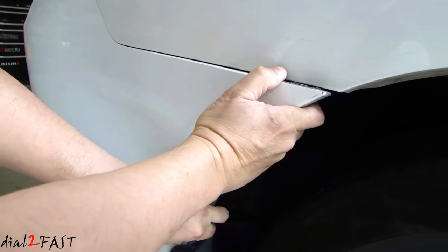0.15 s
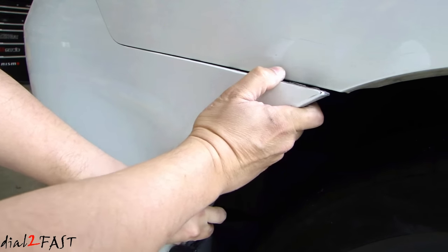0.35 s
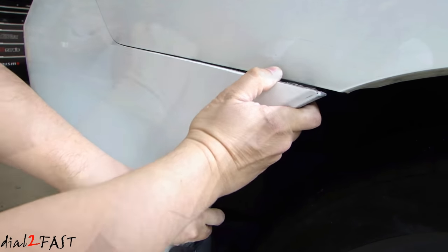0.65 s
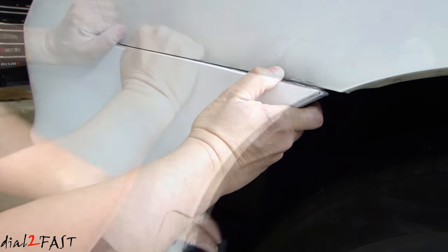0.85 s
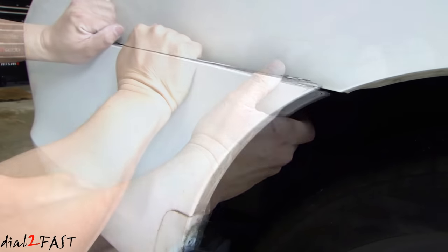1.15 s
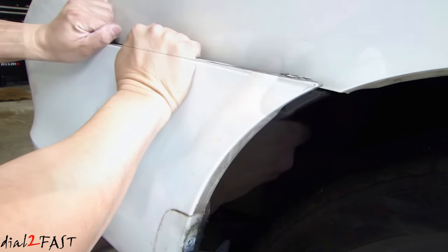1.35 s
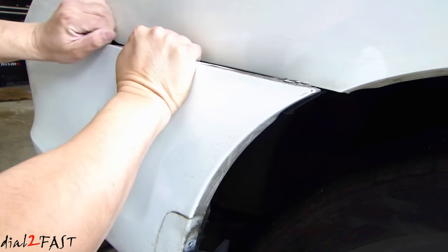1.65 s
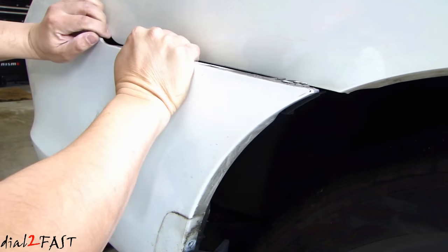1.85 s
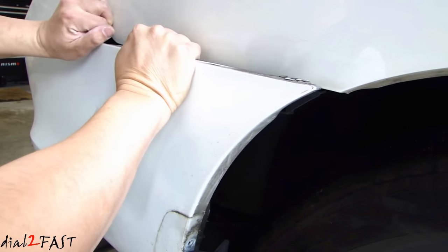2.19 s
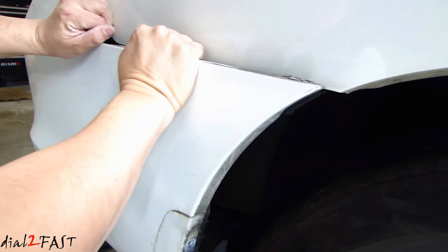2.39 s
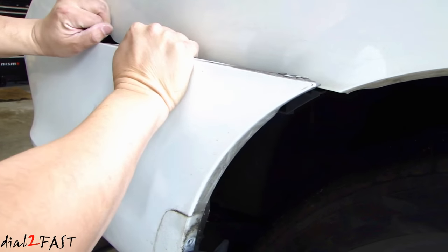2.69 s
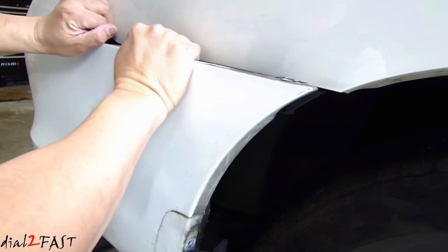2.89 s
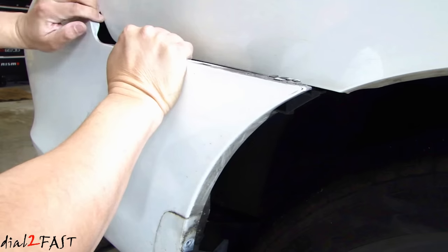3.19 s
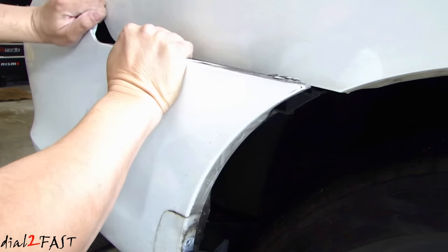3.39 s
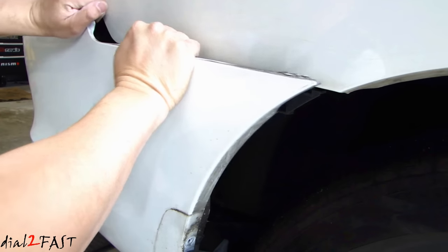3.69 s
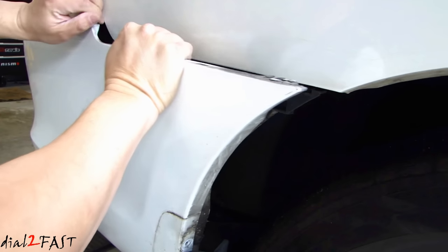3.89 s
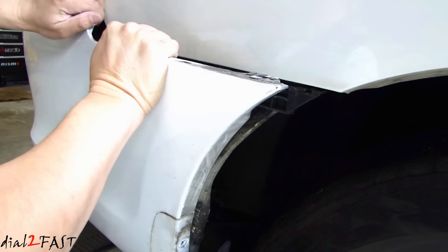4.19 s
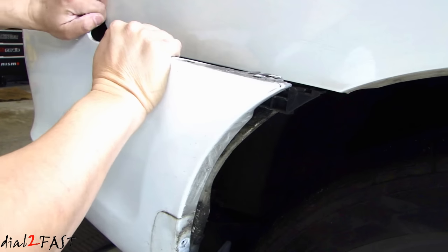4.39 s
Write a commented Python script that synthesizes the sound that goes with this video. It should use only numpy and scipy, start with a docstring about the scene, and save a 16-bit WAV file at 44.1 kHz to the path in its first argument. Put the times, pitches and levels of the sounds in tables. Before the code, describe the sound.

Plastic clips crack loose in two sharp bursts as a car bumper cover is pulled off, with knocks, creaks and scrapes in a reverberant garage.

```python
"""Pulling a bumper cover off a car

Hands pull a plastic bumper cover off in a bare garage: its clips let go with sharp cracks, in two bursts.
Between them it knocks, ticks, groans and scrapes on the wing. Each blow is a jolt and a dying noise crackle
with ringing modes and a garage tail; the friction is shaped noise, and a low sine hums on at the end.
A limiter flattens the loud cracks, and the sound nearly cuts out for an instant after the second burst."""
import sys
import numpy as np
from scipy import signal
from scipy.fft import rfft, irfft, next_fast_len
from scipy.io import wavfile
from scipy.ndimage import uniform_filter1d, map_coordinates

SR = 44100
rng = np.random.default_rng(int(sys.argv[2]) if len(sys.argv) > 2 else 0)


def digitize_waveform(pressure):
    """Quantize a signal to 16-bit integers and store it at the path in sys.argv[1].

    Rows of a 2-D input are taken as channels; values are limited to [-1, 1].
    """
    field = np.atleast_2d(pressure).T
    bounded = np.clip(field, -1, 1)
    quanta = np.round(bounded * 32767).astype(np.int16)
    wavfile.write(sys.argv[1], SR, quanta)


N = 200469  # samples, about 4.5 s

# colour of an edge scraping, shared by slips and creaks: freq_hz, density_db (dB per Hz)
SCRAPE_COLOUR = [(500, -23), (1100, 1), (2500, -2.5), (4000, -7.5), (6500, -23), (12000, -121)]


def amp(db):
    """Decibels to gain."""
    return 10 ** (np.asarray(db) / 20)


def unit(x):
    """Scaled to rms 1."""
    return x / np.sqrt(np.mean(x ** 2) + 1e-20)


def along(points, hz):
    """(Hz, value) points read on a log frequency axis."""
    point_hz, value = np.transpose(points)
    return np.interp(np.log(hz + 1), np.log(point_hz + 1), value)


def filtered(x, response):
    """x times a complex response of frequency, with zero padding against wrap-around."""
    size = x.shape[-1]
    padded = 2 * next_fast_len(size // 2 + 4096)
    spectrum = rfft(x, padded) * response(np.fft.rfftfreq(padded, 1 / SR))
    return irfft(spectrum, padded)[..., :size]


def causal(gain):
    """The minimum-phase response with this gain: it rings only after it is struck."""
    cepstrum = irfft(np.log(np.maximum(gain, 1e-6)))
    half = len(cepstrum) // 2
    folded = np.r_[cepstrum[0], 2 * cepstrum[1:half], np.zeros(half)]
    return np.exp(rfft(folded))


def wobble(rate, size):
    """A smooth random curve through normal values, rate knots a second."""
    knots = rng.standard_normal(int(size * rate / SR) + 4)
    return map_coordinates(knots, [np.arange(size) * rate / SR])


def diffuse(size, strength=1):
    """Stereo noise from all sides, following a strength: alike in the bass, unrelated in the treble."""
    # stereo width of diffuse sound: freq_hz, side_to_mid_db
    width = [(60, -2), (130, -9.5), (330, -8), (690, -4.5), (1270, -3), (2300, 0), (5000, 1), (11000, 1)]
    turn = np.arctan(amp(along(width, np.fft.rfftfreq(size, 1 / SR))))
    noise = rfft(strength * rng.standard_normal((2, size)))
    mid, side = irfft(noise * [np.cos(turn), np.sin(turn)], size)
    return np.array([mid + side, mid - side])


def garage(build_s=0.009):
    """A fresh stereo reverb tail: noise builds up, then each frequency dies at its own speed."""
    # how long the room rings: freq_hz, t60_s
    decay = [(100, 0.26), (300, 0.65), (1000, 0.72), (2700, 0.82), (5000, 0.68), (11000, 0.47)]
    # what the walls return: freq_hz, level_db
    walls = [(100, 14), (400, 3.5), (1200, 3), (3000, -3), (6000, -3), (11000, -1), (13500, -14)]
    hz, t, bands = signal.stft(diffuse(SR), SR, nperseg=256)
    dying = bands * amp(-60 * t / along(decay, hz)[:, None])
    tail = signal.istft(dying, SR, nperseg=256)[1][:, :SR]
    build = 1 - np.exp(-np.arange(SR) / SR / build_s)
    tail = unit(tail * build) / np.sqrt(SR)  # energy 1 before the walls colour it
    return filtered(tail, lambda hz: amp(along(walls, hz)))


def rings(modes, count, longest_s, split=0.01914, neighbour_db=-4, scatter_db=1.5, spread=0.26, swell_s=0.00033):
    """One stereo ring for each of count blows; every mode beats against two close, weaker neighbours."""
    t = np.arange(SR) / SR
    hz, db, t60 = np.repeat(np.array(modes, float), 3, axis=0).T[:, :, None]
    offset = np.tile([-1, 0, 1], len(modes))[:, None]
    # split is the average detuning of a neighbour, as a fraction of its mode
    hz = hz * (1 + split * offset * (.5 + rng.random(hz.shape)))
    # the gripping hands limit every mode to longest_s, and plastic loses its high modes soonest
    life = np.minimum(t60, longest_s) / np.hypot(1, hz / 2500)
    fade = np.exp(-np.log(1000) * t / life)
    waves = amp(db + neighbour_db * np.abs(offset)) * fade * np.exp(2j * np.pi * hz * t)
    # each blow excites the modes a little differently
    size, skew, phase = rng.standard_normal((count, 3, 1, len(hz))).swapaxes(0, 1)
    # higher modes are further out of phase between left and right
    apart = spread * hz.T / np.hypot(hz.T, 1000) * skew * np.array([[1], [-1]])
    weights = amp(scatter_db * size) * np.exp(1j * (np.pi * phase + apart))
    ringing = (weights @ waves).imag * (1 - np.exp(-t / swell_s))
    # little is radiated below the lowest mode
    radiation = signal.butter(N=3, Wn=0.63 * modes[0][0], btype="high", fs=SR, output="sos")
    return signal.sosfilt(radiation, ringing)


def blows(contacts, modes, level_db, modes_db, longest_s, low_hz, spike, grit_db, bright_hz, rise_s, lag_s=.00005):
    """Each contact is one jolt and a gritty, dying crackle; the plastic rings and the garage answers."""
    # contacts: start_s, strength_db, boom_db, sizzle_db, crackle_t60_s, garage_db, ring_db
    # basic colour of a crack: freq_hz, density_db (dB per Hz)
    crack = [(24, -94), (40, -63), (80, -72), (107, -15.5), (160, -25.5), (235, -11), (354, -4),
             (508, -4.5), (710, -5), (781, -3.5), (860, -3), (1200, -6.5), (1720, -10.5), (3000, -11),
             (3700, -17), (5200, -22), (6200, -26.5), (10700, -32), (12300, -33.5), (14000, -64),
             (16000, -92), (22000, -120)]
    out, t = np.zeros((2, N + SR)), np.arange(SR) / SR
    # the jolt reaches the right channel lag_s early and brightens above bright_hz
    side = np.array([[-1], [1]])
    jolt = filtered(signal.unit_impulse(SR, 16), lambda hz: np.exp(1j * np.pi * hz * lag_s * side))
    jolt = filtered(jolt, lambda hz: np.hypot(1, hz / bright_hz))
    all_rings = rings(modes, len(contacts), longest_s)
    for (s, db, boom_db, sizzle_db, t60, room_db, ring_db), ring in zip(contacts, all_rings):
        grit = amp(grit_db * wobble(900, SR))
        envelope = (1 - np.exp(-t / rise_s)) * np.exp(-np.log(1000) * t / t60)
        crackle = unit(diffuse(SR, grit * envelope)) / np.sqrt(SR)
        # spike is the jolt's amplitude against the crackle
        push = (crackle + spike * jolt) / np.hypot(1, spike) + amp(room_db) * garage()
        tilt = [(120, boom_db / 2), (450, boom_db), (1900, 0), (7000, sizzle_db)]

        def colour(hz):
            # small parts radiate little below low_hz
            radiated = hz ** 2 / np.hypot(hz ** 2, low_hz ** 2)
            return causal(amp(along(crack, hz) + along(tilt, hz)) * radiated)

        sound = amp(level_db) * filtered(push, colour) + amp(modes_db + ring_db) * ring
        out[:, round(s * SR):][:, :SR] += amp(db) * sound
    return out[:, :N]


def rub(spectrum, grain_db, grain_rate):
    """Friction noise of rms 1 whose strength flutters as the surfaces catch and slip."""
    size = next_fast_len(N)
    grip = amp(grain_db * wobble(grain_rate, size))
    return unit(filtered(diffuse(size, grip)[:, :N], lambda hz: amp(along(spectrum, hz))))


def air():
    """The quiet garage's steady rush: diffuse noise with a fixed colour."""
    # colour of the rush: freq_hz, density_db (dB per Hz)
    rush = [(15, -50), (25, -13), (74, -10.5), (130, -6), (594, -1.5), (755, -2.5), (886, -4), (1360, -8.5),
            (1720, -8.5), (3730, -14), (5130, -17.5), (9990, -23.5), (12200, -23), (14000, -93)]
    noise = diffuse(next_fast_len(N))[:, :N]
    return amp(-48) * unit(filtered(noise, lambda hz: amp(along(rush, hz))))


def ticks(boom_db=-8, crackle_s=0.12, room_db=-5):
    """Thin, short clicks as hooks catch on the bracket's edge and ring it."""
    # hooks catching: start_s, strength_db, sizzle_db, ring_db
    catches = [(.0644, -40, 13, -9), (1.3145, -28.5, 3, -18), (1.3714, -29, 3.5, -31),
               (1.4033, -27, -2, -14), (1.419, -25.5, -1, -25), (1.488, -35, 9.5, -10),
               (1.5425, -16, 1, 2.5), (1.600, -25, -14, 6), (1.633, -29, -12, 2), (2.4165, -34.5, 0.5, -16),
               (3.548, -32, -19, -8)]
    # modes of the bracket under the hooks: freq_hz, level_db, t60_s (before damping)
    bracket = [(507, -5, 0.11), (604, -1.5, 0.15), (750, 3.5, 0.15), (941, -3, 0.19), (1277, -20, 0.12),
               (1420, -21, 0.3), (1740, -8, .12), (2170, -17, 0.27), (2460, -16, 0.19), (2620, -9, .3),
               (3500, 1, 0.058)]
    contacts = [(s, db, boom_db, sizzle_db, crackle_s, room_db, ring_db)
                for s, db, sizzle_db, ring_db in catches]
    return blows(contacts, bracket, level_db=36.0, modes_db=-17.5, longest_s=0.26, low_hz=540,
                 spike=0.58, grit_db=1.5, bright_hz=12000, rise_s=0.00087)


def flexing(creak_db=-9, attack_s=0.034, release_s=0.01, tremble_db=-3.3, tremble_rate=30):
    """The cover groans unsteadily for as long as the hands bend it, and its edge creaks with a rough grain."""
    # the hands strain and bend the cover: start_s, length_s, level_db
    pulls = [(0.137, 0.042, -35.5), (1.262, 0.069, -49), (1.406, 0.12, -47.5), (1.718, 0.066, -48.5),
             (2.199, 0.67, -46.5), (2.364, .04, -46), (2.545, 0.019, -62), (3.716, .2, -51),
             (3.921, 0.094, -44), (4.007, 0.37, -58.5)]
    # colour of the groan: freq_hz, density_db (dB per Hz)
    flex = [(47, -52), (80, -30), (140, -10.5), (247, -2.5), (350, -4.5), (450, 4.5), (644, -8), (1030, -7),
            (1500, -17.5), (1950, -24), (3300, -120)]
    t, strain = np.arange(N) / SR, np.zeros(N)
    for s, length, db in pulls:
        build = np.clip((t - s) / attack_s, 0, 1)
        ease = np.exp(-np.maximum(t - s - length, 0) / release_s)
        strain += amp(db) * build * ease
    groan = rub(flex, grain_db=2, grain_rate=180)
    creak = rub(SCRAPE_COLOUR, grain_db=3.0, grain_rate=180)
    tremble = amp(tremble_db * wobble(tremble_rate, N))  # the grip is unsteady
    return strain * tremble * (groan + amp(creak_db) * creak)


def dragging():
    """In each slip the cover's edge scrapes the wing and smooth faces hiss, both in step with the speed."""
    # the cover gathers speed until it catches: fastest_s, speeding_up_s, stopping_s, scrape_db, hiss_db
    slips = [(0.187, 0.01, 0.012, -28, -36), (1.75, .06, .05, -55, -61), (1.84, 0.048, 0.023, -44.5, -62),
             (1.88, 0.053, 0.024, -54, -48.5), (2.24, 0.18, 0.02, -50, -55.5),
             (2.385, 0.056, 0.086, -53.5, -55.5), (3.175, 0.1, 0.041, -45, -47.5),
             (3.305, 0.017, 0.022, -45.5, -51), (3.551, 0.01, 0.028, -37.5, -53.5),
             (3.79, 0.11, 0.21, -48, -64), (4.114, 0.088, 0.017, -47, -48.5),
             (4.207, .015, 0.051, -44, -47.5), (4.46, 0.083, 0.049, -44.5, -59)]
    # colour of the smooth faces' hiss: freq_hz, density_db (dB per Hz)
    slide = [(2500, -4), (6000, 1), (8000, -0.5), (11500, 2.5), (13000, -13), (14000, -40)]
    t, out = np.arange(N) / SR, np.zeros((2, N))
    scrape = rub(SCRAPE_COLOUR, grain_db=1.5, grain_rate=220)
    hiss = rub(slide, grain_db=1.8, grain_rate=140)
    for s, rise_s, stop_s, scrape_db, hiss_db in slips:
        speed = np.exp(-np.maximum((s - t) / rise_s, (t - s) / stop_s))
        out += speed * (amp(scrape_db) * scrape + amp(hiss_db) * hiss)
    return out


def snaps(cover_t60=0.81):
    """A clip letting go shakes the whole cover, which rings in step with the blow."""
    # clips letting go, and the cover clattering after them:
    # start_s, strength_db, boom_db, sizzle_db, crackle_t60_s, garage_db
    releases = [(0.1868, 1, 2, 4, 0.039, -1), (0.2195, -9.5, -5.5, -15, 0.031, 7.5),
                (0.2439, -9.5, -7.5, -6, 0.022, 7), (0.2702, -13, 12.5, 3.5, 0.023, -14),
                (2.6961, 7, -3, 7, 0.013, 2), (2.7238, -4.5, 5.5, -4, 0.0087, -1.5),
                (2.769, -3, 0, 4.5, 0.2, 6)]
    # modes of the whole cover: freq_hz, level_db
    cover_modes = [(298.6, -39), (360.7, -32), (431, -28.5), (479.1, -35.5), (592.2, -36.5), (710.6, -28),
                   (830, -36.5), (895, -47), (942.1, -32.5), (1059, -28.5), (1239, -41.5), (1330, -39),
                   (1474, -38), (1618, -39.5), (2157, -61), (2208, -45), (2261, -30), (2476, -46),
                   (2630, -52), (2780, -35), (2890, -45), (3004, -48), (3262, -69)]
    cover = [(hz, db, cover_t60) for hz, db in cover_modes]
    contacts = [(*row, 0) for row in releases]
    return blows(contacts, cover, level_db=30.5, modes_db=4.5, longest_s=1.1, low_hz=153,
                 spike=0.37, grit_db=0.0, bright_hz=3700, rise_s=0.0015)


def knocks(room_db=-8, full_ring_db=-12, ring_slope=0.4):
    """Dull bumps on the side panel: the harder the bump, the more of it goes into ringing."""
    # the flexing cover bumps on its brackets: start_s, strength_db, boom_db, sizzle_db, crackle_t60_s
    bumps = [(.552, -27, 13, -16, 0.28), (0.671, -30.5, 10, 2, 0.18), (.845, -25, 11, -24, 0.29),
             (0.9106, -12, 1, 6, .018), (0.9136, -12.5, 7, 2.5, 0.075), (0.918, -26, 23.5, -26, 0.036),
             (1.835, -35, 15.5, -11, 0.074), (2.553, -47.5, 28.5, -10, 0.08)]
    # modes of the side panel: freq_hz, level_db, t60_s (before damping)
    panel = [(201.6, -19, 0.44), (262, -20.5, 0.83), (348, -10, 0.55), (417, -1.5, 0.29), (429, -5.5, 0.28),
             (543.4, -9, 0.31), (585, -1, 0.41), (768, -4.5, 0.2), (894, -35, .4), (1040, -6, 0.28),
             (1180, -16, 0.22), (1840, -28, .5), (2640, -47, 0.44)]
    contacts = [(s, db, *colour, room_db, ring_slope * (db - full_ring_db)) for s, db, *colour in bumps]
    return blows(contacts, panel, level_db=32, modes_db=-8, longest_s=0.69, low_hz=144,
                 spike=0.55, grit_db=2.0, bright_hz=18110, rise_s=0.0018)


def wing(hz=249.0, db=-46, t60=5):
    """The last big snap leaves the steel wing humming on one low, slowly dying note."""
    t = np.maximum(np.arange(N) / SR - 2.7, 0)
    return amp(db) * np.sin(2 * np.pi * hz * t) * np.exp(-np.log(1000) * t / t60)


def scene():
    """Ticks, friction, snaps, knocks and hum over the garage's rush, a little to the right."""
    mix = air() + ticks() + flexing() + dragging() + snaps() + knocks() + wing()
    return mix * amp([[-.8], [.8]])


def limiter(x, threshold_db=-11, attack_s=0.0052, release_db_per_s=65):
    """The gain falls within milliseconds of a loud crack and creeps back while the garage dies away."""
    pole = np.exp(-1 / (attack_s * SR))
    power = signal.lfilter([1 - pole], [1, -pole], np.mean(x ** 2, axis=0))
    excess = np.maximum(10 * np.log10(power + 1e-12) - threshold_db, 0)
    # a running maximum against a ramp makes the reduction fall at a steady rate
    ramp = release_db_per_s * np.arange(N) / SR
    held = np.maximum.accumulate(excess + ramp) - ramp
    reduction_db = signal.lfilter([1 - pole ** 2], [1, -pole ** 2], held)
    return x * amp(-reduction_db)


def record(dry, gap_db=-25, gap_start_s=2.8443, gap_end_s=2.8655, ceiling=0.86, low_cut_hz=70, top_hz=13800):
    """Limiter, rounded peaks, an instant in which the sound nearly cuts out, a low cut and a steep top cut."""
    t = np.arange(N) / SR
    x = limiter(dry)
    x = x / (1 + (x / ceiling) ** 4) ** (1 / 4)
    in_gap = (t > gap_start_s) & (t < gap_end_s)
    x = x * uniform_filter1d(amp(gap_db * in_gap), size=64)
    x = signal.sosfilt(signal.butter(N=2, Wn=low_cut_hz, btype="high", fs=SR, output="sos"), x)
    return filtered(x, lambda hz: 1 / np.hypot(1, (hz / top_hz) ** 40))


dry = scene()
out = record(dry)
digitize_waveform(out)
```